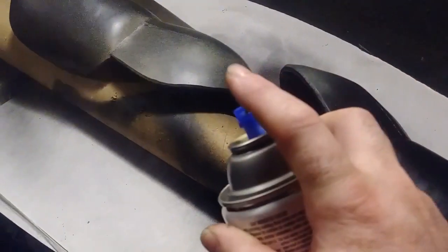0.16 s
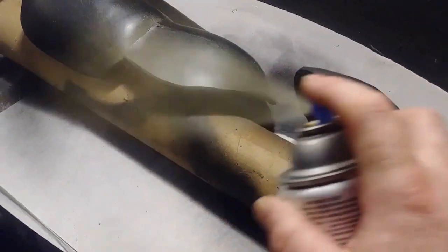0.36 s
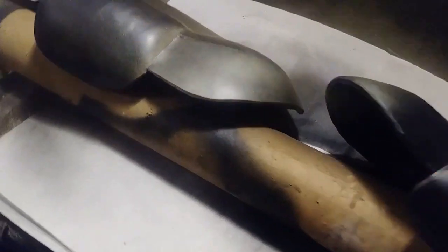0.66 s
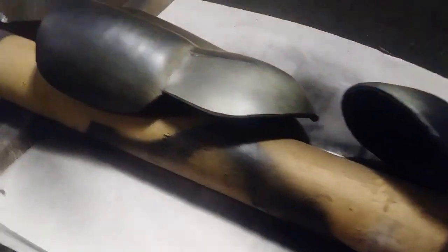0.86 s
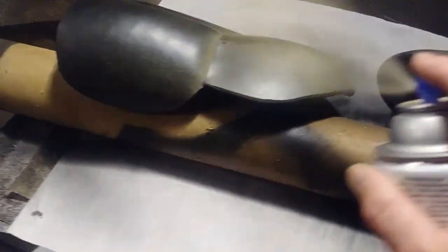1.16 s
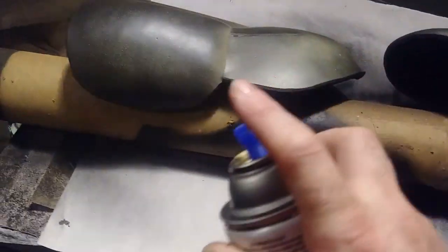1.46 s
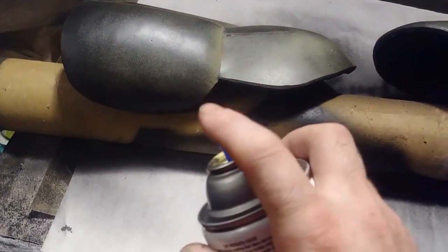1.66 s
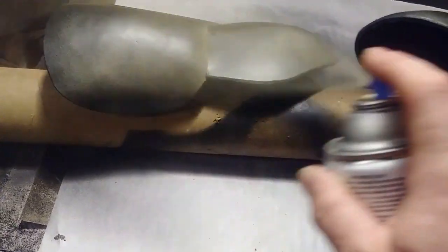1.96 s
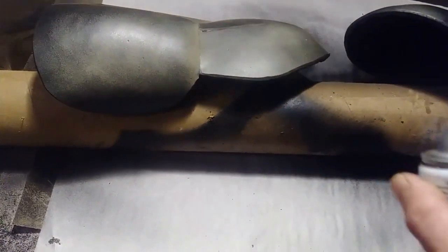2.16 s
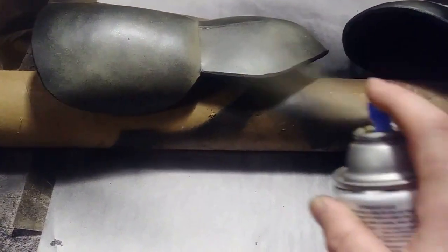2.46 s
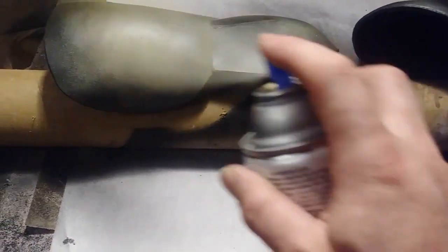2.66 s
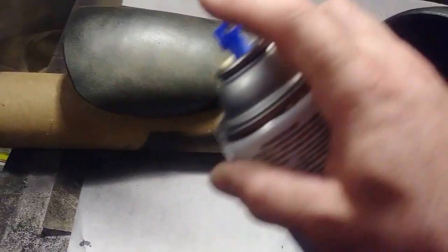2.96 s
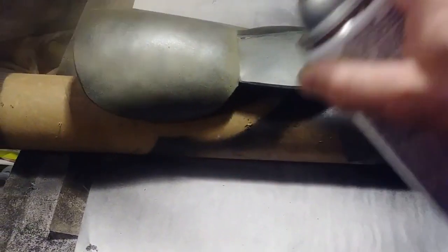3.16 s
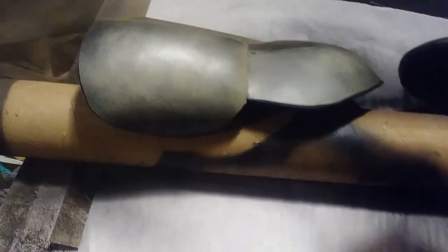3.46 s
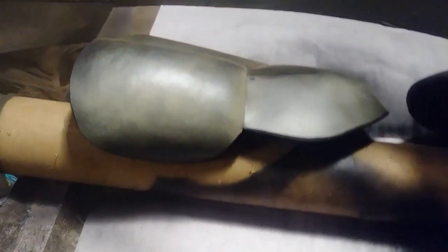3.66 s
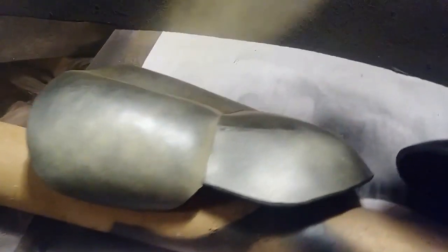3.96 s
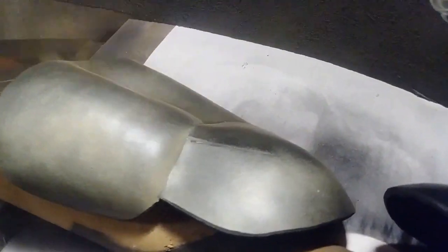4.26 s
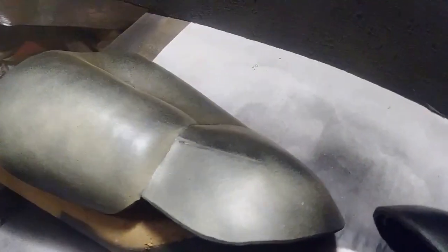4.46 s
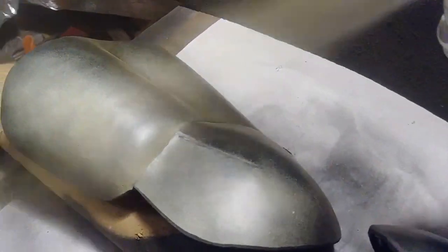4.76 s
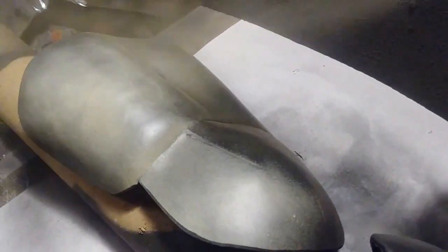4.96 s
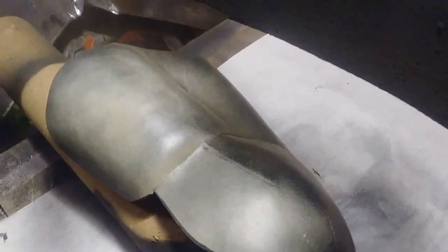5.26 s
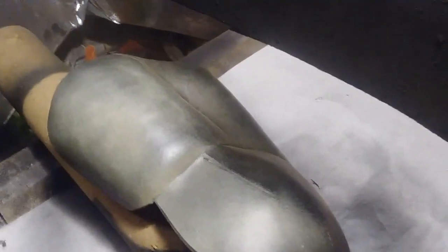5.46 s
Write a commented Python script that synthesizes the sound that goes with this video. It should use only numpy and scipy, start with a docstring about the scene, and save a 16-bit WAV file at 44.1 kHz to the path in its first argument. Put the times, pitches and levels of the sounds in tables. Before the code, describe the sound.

In a workshop with a faint low hum, an aerosol paint can sprays eight short, evenly paced bursts close to the microphone. Each hiss starts and stops with a little spit of the valve, and the last two sputter. Fingers rub and tap lightly between presses. At the end the can is shaken: paint sloshes softly and the mixing ball clacks loudly against the steel.

```python
"""A low hum fills a workshop. Close by, an aerosol paint can sprays eight short bursts over foam pieces.
The valve spits as it opens and shuts, the jet blows across hollows in the foam, and the bench echo
sweeps as the hand swings to and fro. Fingers rub and tap between presses, and the foam bumps softly.
In the last two bursts paint and gas mix and the jet sputters. Then the can is shaken: the paint
sloshes and the mixing ball hits the steel."""
import sys
import numpy as np
from scipy import signal
from scipy.fft import rfft, irfft, next_fast_len
from scipy.io import wavfile
from scipy.ndimage import map_coordinates

SR = 44100
rng = np.random.default_rng(int(sys.argv[2]) if len(sys.argv) > 2 else 0)


def output_pcm(signal):
    """Save a mono or channel-first signal as 16-bit PCM at the path in sys.argv[1].

    Samples are clipped to [-1, 1] before scaling.
    """
    pcm = np.clip(np.atleast_2d(signal).T, -1, 1) * 32767
    wavfile.write(sys.argv[1], SR, np.round(pcm).astype(np.int16))


N = 247401
T = np.arange(N) / SR


def amp(db):
    """Decibels to gain."""
    return 10 ** (np.asarray(db) / 20)


def unit(x):
    """Scale to rms 1."""
    return x / np.sqrt(np.mean(x ** 2) + 1e-20)


def along(points, hz):
    """Read a curve of (frequency [Hz], value) points on a log axis."""
    f, v = np.transpose(points)
    return np.interp(np.log(hz + 1), np.log(f + 1), v)


def bell(hz, centre_hz, octaves):
    """A smooth band on a log axis."""
    return np.exp(-.5 * (np.log2((hz + 1) / centre_hz) / octaves) ** 2)


def resonance(hz, centre_hz, width_hz):
    """A resonant peak of the given width."""
    return 1 / (1 + (2 * (hz - centre_hz) / width_hz) ** 2)


def filtered(x, response):
    """EQ x with a gain curve over frequency."""
    m = next_fast_len(N + SR // 2)
    return irfft(rfft(x, m) * response(np.fft.rfftfreq(m, 1 / SR)), m)[:N]


def noise(response):
    """Noise of rms 1 with the given colour."""
    return unit(filtered(rng.standard_normal(N), response))


def wobble(rate):
    """A smooth random modulator, rate knots a second."""
    return map_coordinates(rng.standard_normal(N // 8), [T * rate], mode="mirror")


def swell(start, end, attack, release):
    """Envelope that rises, holds until the end, then dies away."""
    return np.clip((T - start) / attack, 0, 1) * np.exp(-np.maximum(T - end, 0) / release)


def strike(s, db, t60):
    """Envelope of a light contact that dies quickly."""
    age = np.clip(T - s, 0, 2 * t60)
    return amp(db - 60 * age / t60) * np.minimum(age / 0.0014, 1)


# hum bands: (frequency [Hz], width [Hz], level [dB])
HUM_BANDS = [(118.6, 6.9, -65), (206.3, 20, -62)]
# ventilation EQ: (frequency [Hz], gain [dB])
VENT_EQ = [(25, -23.5), (90, -9), (210, 1.5), (300, -11), (430, -27), (900, -32.5), (2000, -36),
           (4200, -36), (6500, -47), (15000, -47)]

def room_tone(vent_db=-60):
    """A bed of ventilation drone and mains hum."""
    hum = sum(amp(db) * noise(lambda f: resonance(f, hz, width)) for hz, width, db in HUM_BANDS)
    return hum + amp(vent_db) * noise(lambda f: amp(along(VENT_EQ, f)))


# nozzle cavity resonances: (frequency [Hz], width [Hz], strength [dB])
CAVITIES = [(1780, 730, -15), (4820, 1300, -0.5), (8260, 840, -7.5)]

def turbulence(eq, rough_db, rate):
    """Gas rushes through the nozzle's cavities; droplets make its level flutter."""
    cavity = lambda f: 1 + sum(amp(db) * resonance(f, hz, width) for hz, width, db in CAVITIES)
    flow = rng.standard_normal(N) * amp(rough_db * wobble(rate))
    return unit(filtered(flow, lambda f: amp(along(eq, f)) * cavity(f)))


# nozzle presses: (open [s], shut [s], hiss [dB], opening spit [dB], closing spit [dB],
# hollow pitch [Hz], hollow level [dB re the jet])
BURSTS = [(-.1, 0.157, -41.5, -30, -25.5, 1403, -12), (0.447, .817, -42, -24.5, -27, 809, -25.5),
          (1.143, 1.522, -42, -25.5, -26, 822, -25.5), (1.825, 2.22, -42, -24, -27.5, 798, -21),
          (2.597, 2.911, -42, -25.5, -25.5, 797, -30), (3.273, 3.669, -43, -22.5, -28, 832, -27.5),
          (3.972, 4.288, -42.5, -26, -27.5, 915, -29), (4.775, 5.126, -42, -26.5, -25.5, 992, -31)]
# EQ of the hiss and of the spit: (frequency [Hz], gain [dB])
HISS_EQ = [(300, -52.5), (600, -37.5), (900, -30), (1250, -9.5), (1800, -1), (3000, -1), (4200, -2.5),
           (5100, -2), (6100, -12.5), (8600, -10), (9900, -17.5), (12500, -14), (15700, -9)]
SPIT_EQ = [(210, -52.5), (350, -34.5), (513, -48), (969, -10.5), (1310, -9.5), (1770, -0.5), (3200, 3),
           (3460, 0), (4760, 1.5), (6340, -16), (8050, -16), (9740, -23), (15700, -51)]
# top of the hiss, rising as the nozzle turns toward the listener: (time [s], level [dB])
SIZZLE_RIDE = [(.5, -65), (2.8, -57), (5, -53.5)]
# the stem knocks the can on opening: (level [dB re the spit], centre [Hz], width [octaves], t60 [s])
STEM_KNOCK = (-11.5, 1852, 0.75, 0.1426)

def spray(rise_s=0.014, fall_s=0.0077, shut_lead_s=.0195, shut_fade_s=0.012):
    """The open valve hisses evenly; half open, on the way down and up, it spits."""
    hiss, spit, gate, hollow_drive, knocks = np.zeros((5, N))
    stem_db, stem_hz, stem_octaves, stem_t60 = STEM_KNOCK
    for start, stop, hiss_db, open_db, shut_db, _, hollow_db in BURSTS:
        valve = np.clip((T - start) / .006, 0, 1) * np.clip((stop - T) / .004 + .5, 0, 1)
        flow = amp(hiss_db) * valve
        # the opening spit swells to a sharp peak
        age = T - start - rise_s
        opening = amp(open_db) * valve * np.exp(-np.abs(age) / np.where(age < 0, .004, fall_s))
        # the closing spit starts abruptly and is cut off by the seal
        age = np.maximum(T - stop + shut_lead_s, 0)
        closing = amp(shut_db) * valve * np.minimum(age / 0.0022, 1) * np.exp(-age / shut_fade_s)
        knocks += strike(start + rise_s, open_db + stem_db, stem_t60)
        gate += valve
        hiss += flow
        spit += opening + closing
        hollow_drive += amp(hollow_db) * (flow + opening + closing)
    sizzle = gate * amp(np.interp(T, *np.transpose(SIZZLE_RIDE)))
    return (hiss * amp(0.9 * wobble(16)) * turbulence(HISS_EQ, rough_db=1.0, rate=510)
            + sizzle * noise(lambda f: bell(f, 7800, 0.81))
            + hollow_drive * hollow()
            + knocks * noise(lambda f: bell(f, stem_hz, stem_octaves))
            + spit * turbulence(SPIT_EQ, rough_db=3.5, rate=900))


# modes of a curved foam piece: (pitch ratio, width [Hz], gain [dB])
HOLLOW_MODES = [(1, 55, -6.5), (1.389, 50, -3)]

def hollow(fitful_db=3, wander=.035):
    """The jet blows fitfully across the hollow of a curved piece, a different one at each press."""
    starts, *_, hz, _ = np.transpose(BURSTS)
    burst = np.searchsorted(starts, T, side="right") - 1
    pitch = hz[burst] * (1 + wander * wobble(9))  # drifts as the aim shifts
    phase = 2 * np.pi * np.cumsum(pitch) / SR
    slow = lambda width: noise(lambda f: np.exp(-.5 * (f / width) ** 2))
    out = np.zeros(N)
    for ratio, width, db in HOLLOW_MODES:
        level = amp(db + fitful_db * wobble(21.93))
        breathy_tone = slow(width) * np.cos(ratio * phase) + slow(width) * np.sin(ratio * phase)
        out += level * breathy_tone
    return out


# turning points of the hand's swing: (time [s], bench echo delay [ms])
SWING_TURNS = [(-0.3, 2.06), (0.33, 2.51), (0.84, 2.01), (1.66, 2.73), (2.37, 2.49), (3.19, 2.73),
               (3.78, 1.54), (4.37, 2.23), (5.24, 1.88)]

def swing():
    """The bench echo's delay in ms: the hand eases from one turning point to the next."""
    s, ms = np.transpose(SWING_TURNS)
    turns = np.arange(len(s))
    part, turn = np.modf(np.interp(T, s, turns))
    return np.interp(turn + (1 - np.cos(np.pi * part)) / 2, turns, ms)


# the jet beams its treble at the bench: (frequency [Hz], gain [dB])
BEAM_EQ = [(4000, -1.5), (13000, 2.5)]
# echo strengths relative to the direct jet: (bench, foam)
ECHO_GAINS = (.33, .25)
# still echoes off things beside the listener: (delay [ms])
NEAR_CLUTTER = (.78, .98, 1.11)

def bench(x, moving_clutter=4, clutter_gain=.14):
    """Echoes off the bench, the nearer foam and clutter flange the hiss; most glide with the hand."""
    bench_ms = swing()
    foam_ms = .5 + .39 * bench_ms
    clutter_ms = [*NEAR_CLUTTER] + [bench_ms + extra for extra in rng.uniform(-1, 3, moving_clutter)]
    delays = [bench_ms, foam_ms] + clutter_ms
    gains = [*ECHO_GAINS] + [clutter_gain] * len(clutter_ms)
    beamed = filtered(x, lambda f: amp(along(BEAM_EQ, f)))
    echoes = sum(gain * map_coordinates(beamed, [(T - ms / 1000) * SR]) for gain, ms in zip(gains, delays))
    return (x + echoes) / np.linalg.norm((1, *gains))


# reverb decay: (frequency [Hz], t60 [s])
ROOM_DECAY = [(200, 0.21), (1000, 0.31), (3000, 0.41), (5000, 0.27), (9000, 0.34), (15000, 0.29)]
# colour of the walls: (frequency [Hz], gain [dB])
WALL_EQ = [(300, 7), (2000, -4), (4800, -3.5), (7000, -6), (15000, -4.5)]

def workshop(x, wet_db):
    """The room's tail, ever changing as the can moves; each frequency dies at its own speed."""
    wet = np.zeros(N)
    for span in np.array_split(np.arange(N), 20):
        hz, t, bands = signal.stft(rng.standard_normal(SR // 2), SR, nperseg=256)
        decay = amp(-60 * t / along(ROOM_DECAY, hz)[:, None])
        tail = signal.istft(bands * decay, SR, nperseg=256)[1]
        tail *= np.minimum(np.arange(len(tail)) / SR / 0.0049, 1)
        reverb = signal.fftconvolve(x[span], tail / np.linalg.norm(tail))[:N - span[0]]
        wet[span[0]:span[0] + len(reverb)] += reverb
    return amp(wet_db) * filtered(wet, lambda f: amp(along(WALL_EQ, f)))


# rubs on the can: (start [s], end [s], level [dB], centre [Hz], width [octaves])
FINGER_RUBS = [(.265, .28, -58, 2800, .3), (1.015, 1.14, -55.5, 2600, .36), (5.315, 5.331, -45, 1900, .3),
               (5.342, 5.35, -63, 5500, .5), (5.402, 5.443, -60, 7200, .3)]
# taps on the nozzle: (time [s], level [dB], centre [Hz], width [octaves])
FINGER_TAPS = [(.355, -68, 3530, .06), (1.024, -55, 3180, 0.12), (1.765, -56, 3830, .04),
               (2.516, -65.5, 3440, 0.037), (3.941, -38, 4130, 0.22)]

def fingers(attack_s=0.0029, release_s=0.019, tap_t60=0.097):
    """Fingers rub grainily on the can and settle on the nozzle with a tick before a press."""
    rubs = sum(amp(db) * swell(start, end, attack_s, release_s) * noise(lambda f: bell(f, hz, octaves))
               for start, end, db, hz, octaves in FINGER_RUBS)
    taps = sum(strike(s, db, tap_t60) * noise(lambda f: bell(f, hz, octaves))
               for s, db, hz, octaves in FINGER_TAPS)
    return rubs * amp(3.2 * wobble(100)) + taps


# foam bumps: (time [s], level [dB])
FOAM_HITS = [(3.153, -66), (3.529, -63), (3.749, -66.5)]

def foam_bumps(hz=581, octaves=0.061, t60=0.24):
    """The foam pieces bump softly, sounding one narrow band."""
    return sum(strike(s, db, t60) for s, db in FOAM_HITS) * noise(lambda f: bell(f, hz, octaves))


# sputter cues: (start [s], end [s], level [dB], release [s])
SPUTTERS = [(4.194, 4.245, -25.3, 0.017), (4.787, 4.921, -27, 0.024)]
# EQ of the froth: (frequency [Hz], gain [dB])
FROTH_EQ = [(150, -45.5), (250, -27.5), (379, -27.5), (483, -14.5), (1210, -12), (1490, -3), (2680, -1.5),
            (3300, -4.5), (4670, 2), (6160, -20), (7080, -14.5), (11500, -27), (15700, -40)]

def sputter(attack_s=.004):
    """Paint and gas mix in the valve and the jet breaks into a rough froth."""
    envelope = sum(amp(db) * swell(start, end, attack_s, release) for start, end, db, release in SPUTTERS)
    return envelope * amp(1.8 * wobble(150)) * turbulence(FROTH_EQ, rough_db=-0.5, rate=1400)


# slosh cue: (start [s], end [s], level [dB], attack [s], release [s])
SLOSH_CUE = (5.17, 5.45, -54.5, .17, 1)
# EQ of the moving paint: (frequency [Hz], gain [dB])
SLOSH_EQ = [(500, -20.5), (1100, -7.5), (1700, 5), (2800, 8), (5000, -2.5), (6500, -23.5), (8500, -21),
            (11000, -34.5), (15000, -48.5)]

def slosh():
    """Paint sloshes in a fluttering swell as the can swings up."""
    start, end, db, attack, release = SLOSH_CUE
    envelope = amp(db) * swell(start, end, attack, release) * amp(3.2 * wobble(100))
    return envelope * noise(lambda f: amp(along(SLOSH_EQ, f)))


# ball hits: (time [s], level [dB], excited band centre [Hz], width [octaves], crack [dB re the hit])
BALL_HITS = [(5.4497, -5, 1990, 0.19, -16.5), (5.4664, -6.5, 4020, 0.31, -1),
             (5.4735, -8, 3850, 0.15, -20.5), (5.478, -1, 2000, 0.2, -20), (5.5648, -21, 2200, 0.4, -10),
             (5.598, -0.5, 3220, 0.17, -31), (5.604, -2, 3400, 0.4, -17.5)]
# modes of the steel can: (frequency [Hz], relative level [dB], t60 [s])
CAN_MODES = [(1410, 2.5, 0.024), (1967, -19.5, 0.12), (2007, 11, 0.02), (2124, -0.5, 0.03),
             (2295, 2.5, 0.037), (2680, -18, 0.022), (2910, -1.5, 0.027), (3390, -17, 0.1),
             (3560, -11, 0.095), (3810, 1, 0.015), (3910, -14, 0.14), (3890, 1.5, 0.015), (4480, -18, .04),
             (4760, -24, 0.035), (7600, -12, 0.018), (7460, -24, 0.009)]
# EQ of the contact crack: (frequency [Hz], gain [dB])
CRACK_EQ = [(30, 0), (200, -22), (700, -7.5), (1500, -4.5), (4200, 10), (6000, -9), (8000, -3),
            (10000, -24.5), (16000, -23)]

def rattle(contact_cycles=1.18, crack_t60=0.043, spill=0.073):
    """Each blow of the mixing ball cracks and rings the can's modes nearest its own band."""
    out = np.zeros(N)
    hz, db, t60 = np.transpose(CAN_MODES)[:, :, None]
    t = np.arange(SR // 3) / SR
    crack = noise(lambda f: amp(along(CRACK_EQ, f)))
    for s, hit_db, centre_hz, octaves, crack_db in BALL_HITS:
        start = round(s * SR)
        age = t[:N - start]
        span = slice(start, start + len(age))
        weights = amp(db + rng.normal(0, 2.7, db.shape)) * (bell(hz, centre_hz, octaves) + spill)
        # the paint inside loads the wall differently at every blow
        pitch = hz * (1 + rng.normal(0, .008, hz.shape))
        modes = weights * amp(-60 * age / t60) * np.sin(2 * np.pi * pitch * age)
        ring = modes.sum(axis=0) / np.linalg.norm(weights)
        snap = amp(crack_db - 60 * age / crack_t60) * crack[span]
        # a softer contact rings lower and rises more slowly
        attack = 1 - np.exp(-age * centre_hz / contact_cycles)
        out[span] += amp(hit_db) * (ring + snap) * attack
    return out


def scene():
    """The mono mix: the jet feeds the bench echoes, jet and ball feed the reverb, handling stays dry."""
    jet = spray() + sputter()
    ball = rattle()
    handling = fingers() + foam_bumps() + slosh()
    reverb = workshop(jet + amp(-1) * ball, wet_db=-8.0)
    return (room_tone() + bench(jet) + handling + ball + reverb)[None]


def record(dry, low_cut_hz=50, top_hz=15900):
    """Master chain: clip at full scale, roll off the deep bass and cut the extreme top steeply."""
    low_cut = lambda hz: hz ** 2 / (hz ** 2 + low_cut_hz ** 2)
    high_cut = lambda hz: np.clip((top_hz - hz) / 300 + .5, 0, 1)
    return filtered(np.clip(dry[0], -1, 1), lambda hz: low_cut(hz) * high_cut(hz))[None]


dry = scene()
out = record(dry)
output_pcm(out)
```